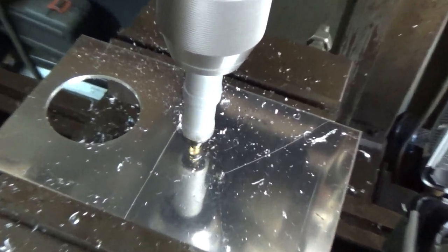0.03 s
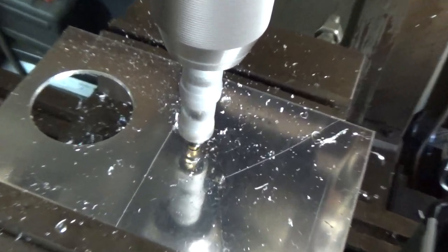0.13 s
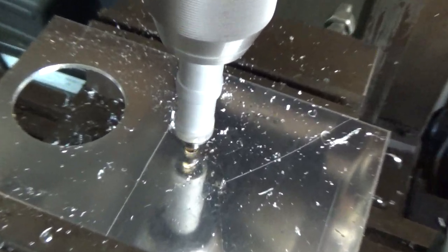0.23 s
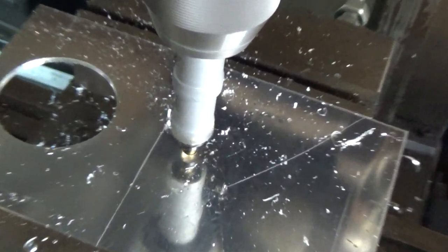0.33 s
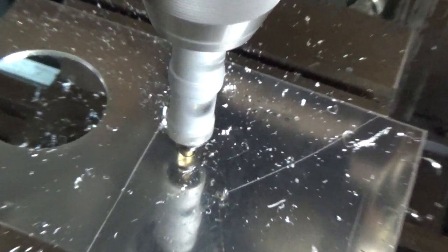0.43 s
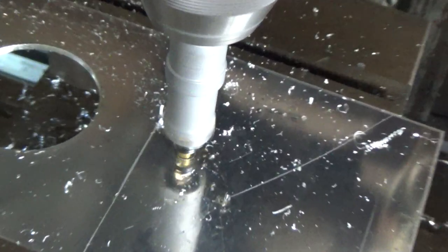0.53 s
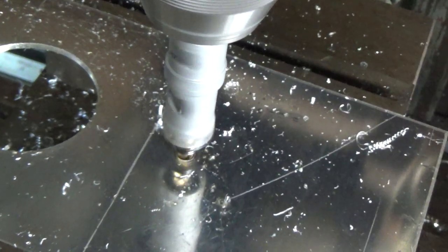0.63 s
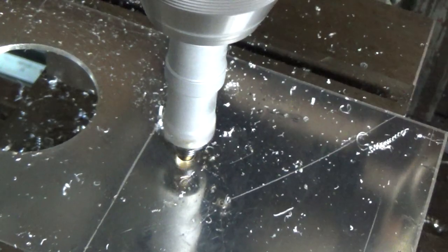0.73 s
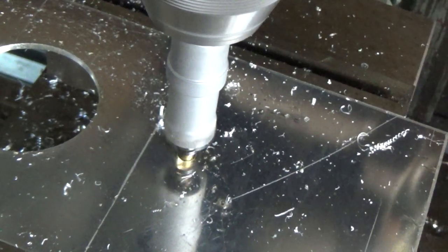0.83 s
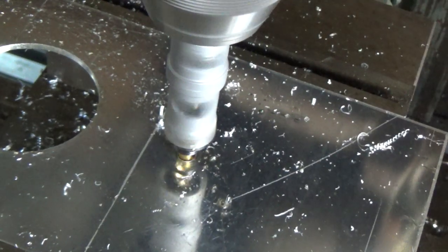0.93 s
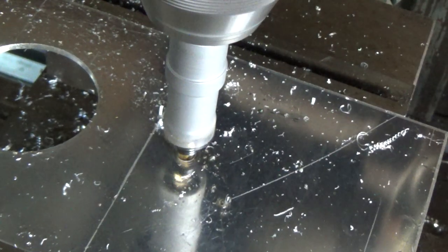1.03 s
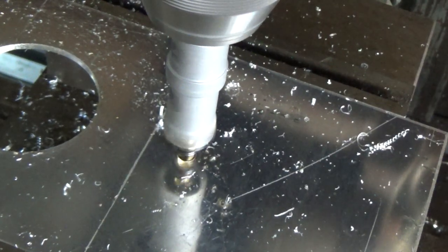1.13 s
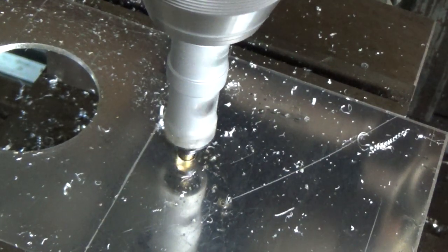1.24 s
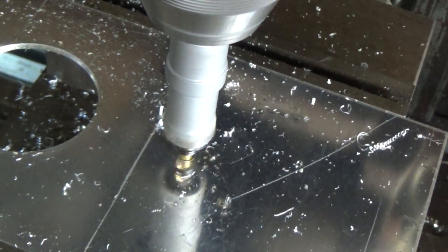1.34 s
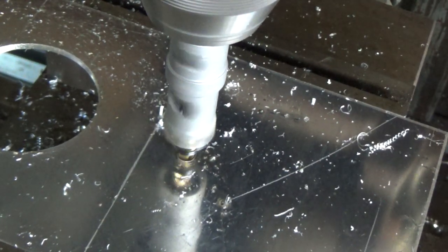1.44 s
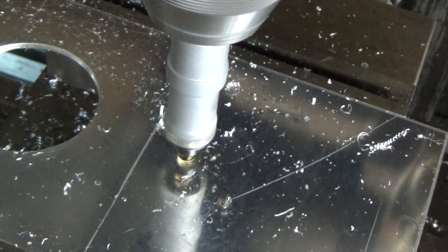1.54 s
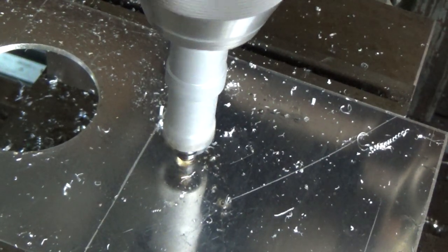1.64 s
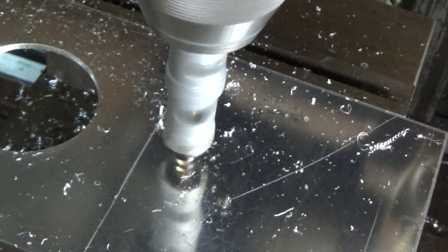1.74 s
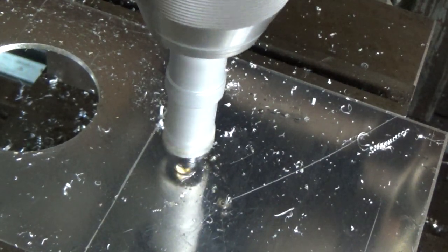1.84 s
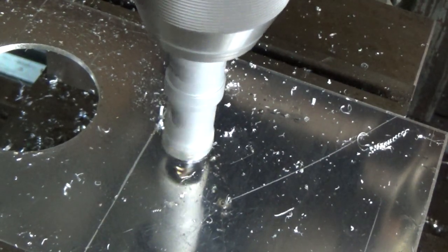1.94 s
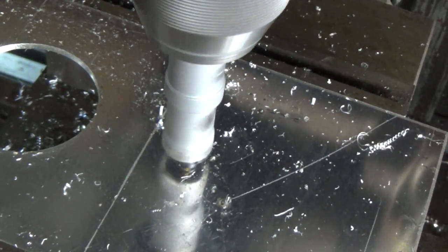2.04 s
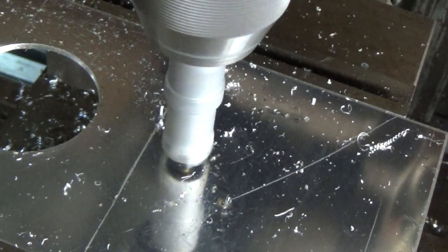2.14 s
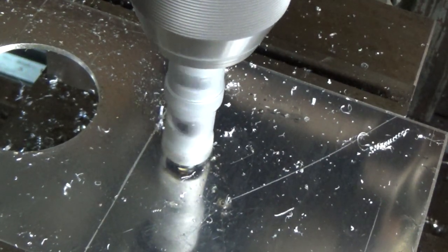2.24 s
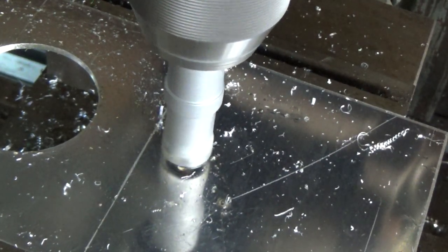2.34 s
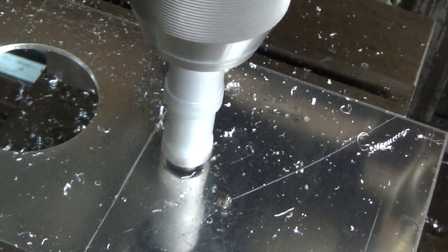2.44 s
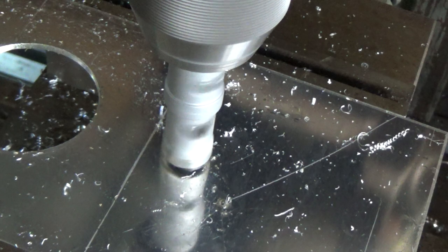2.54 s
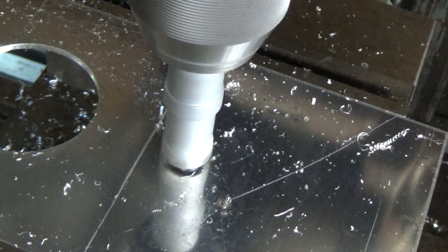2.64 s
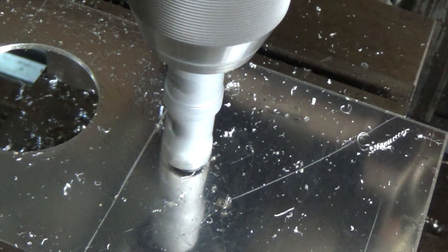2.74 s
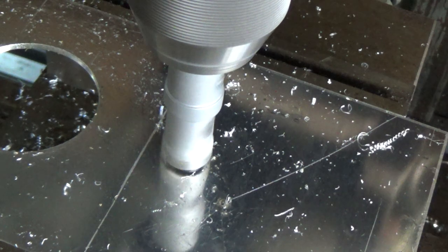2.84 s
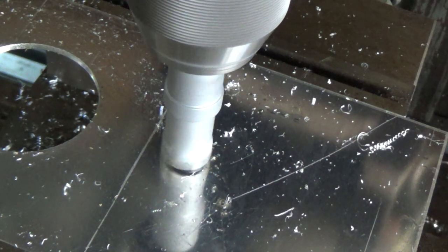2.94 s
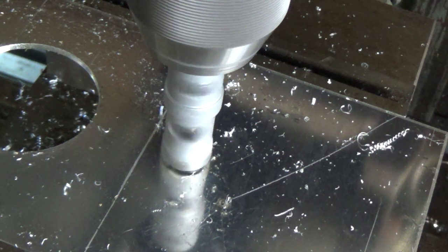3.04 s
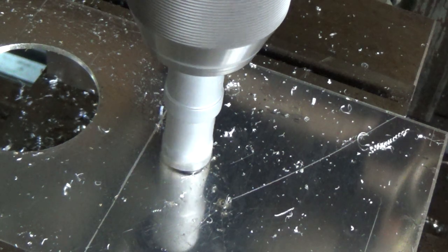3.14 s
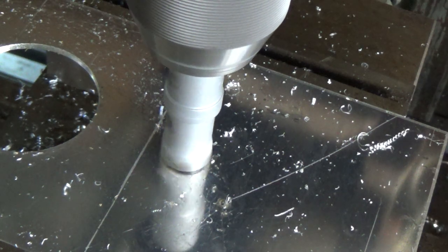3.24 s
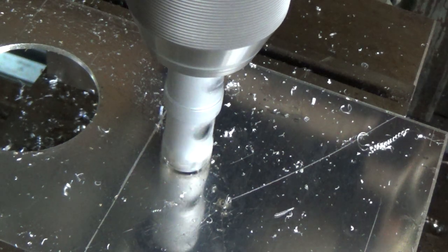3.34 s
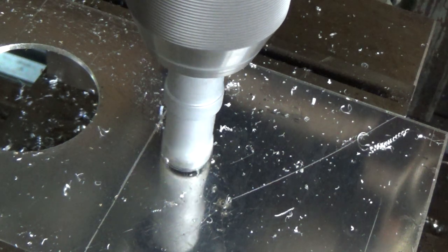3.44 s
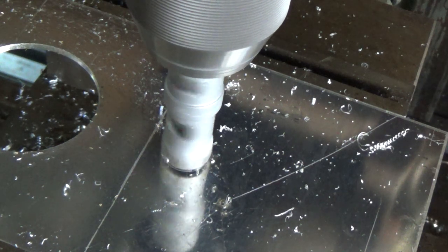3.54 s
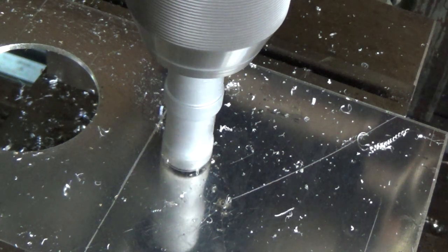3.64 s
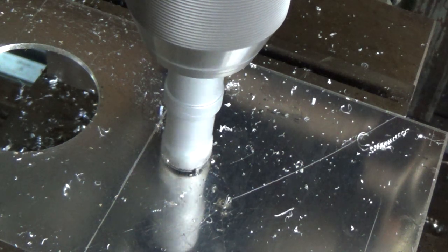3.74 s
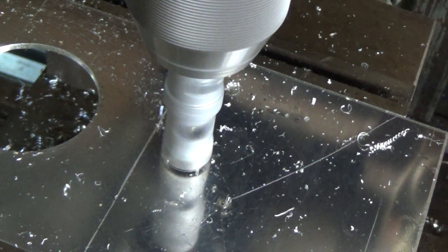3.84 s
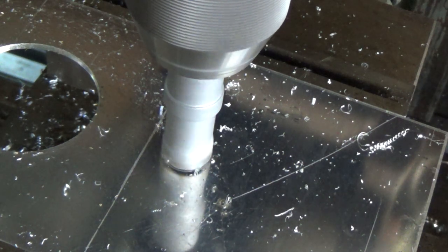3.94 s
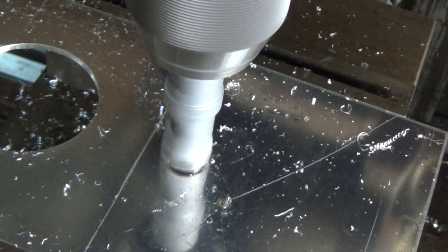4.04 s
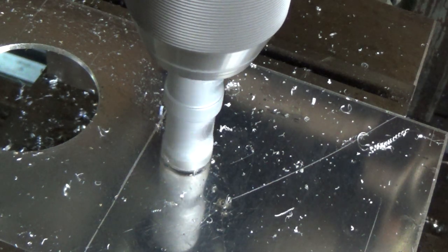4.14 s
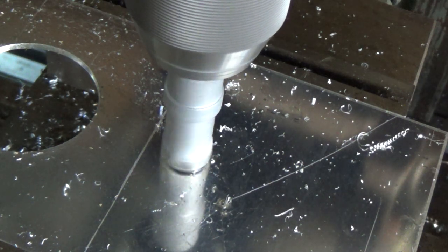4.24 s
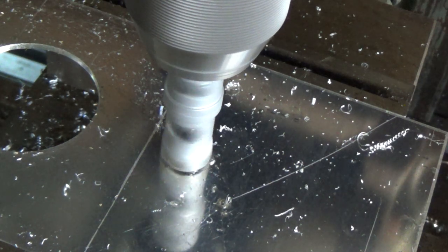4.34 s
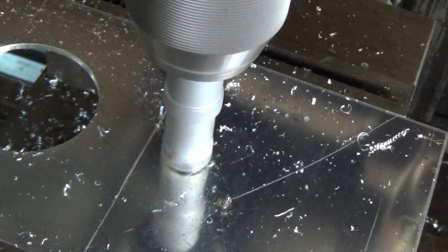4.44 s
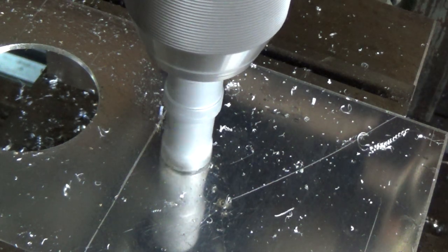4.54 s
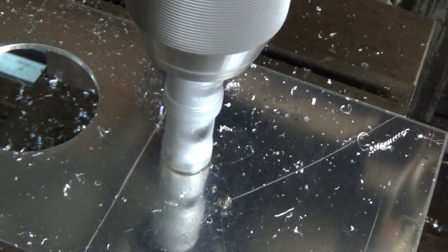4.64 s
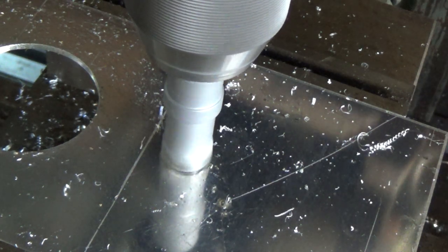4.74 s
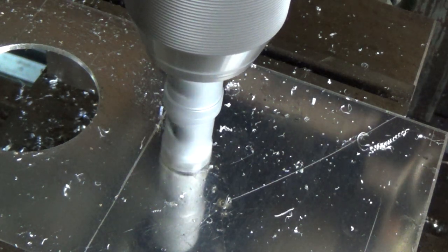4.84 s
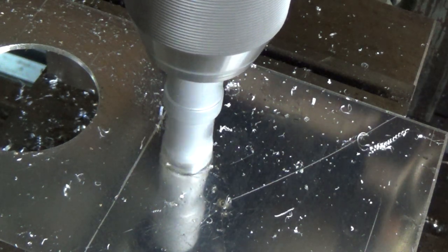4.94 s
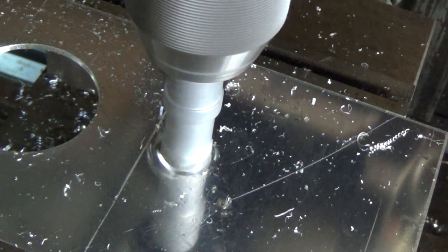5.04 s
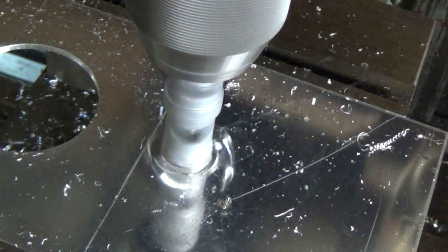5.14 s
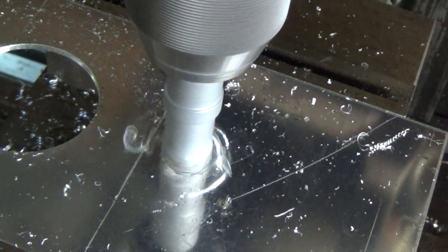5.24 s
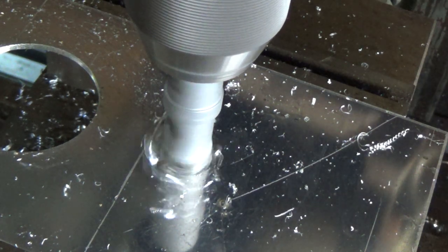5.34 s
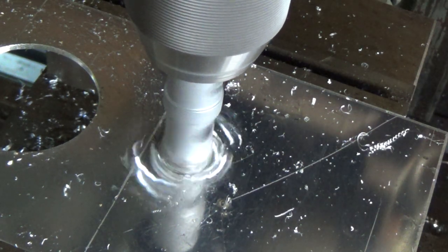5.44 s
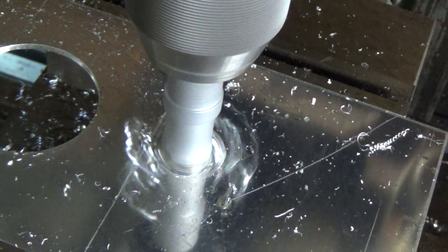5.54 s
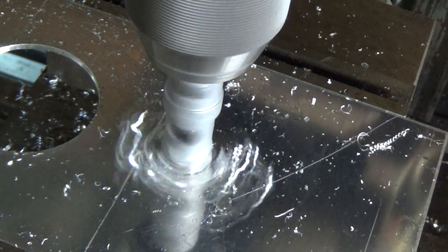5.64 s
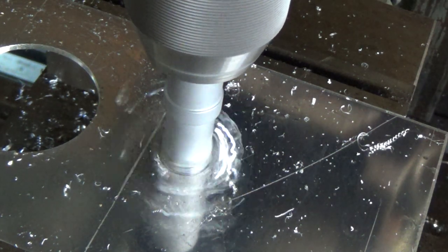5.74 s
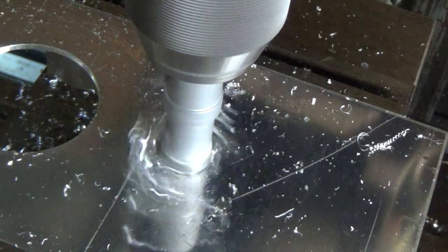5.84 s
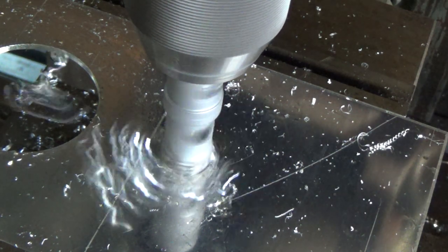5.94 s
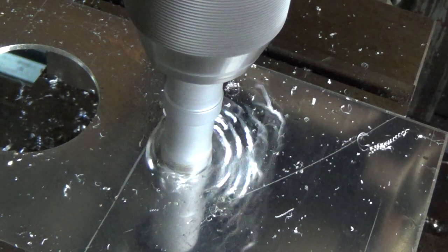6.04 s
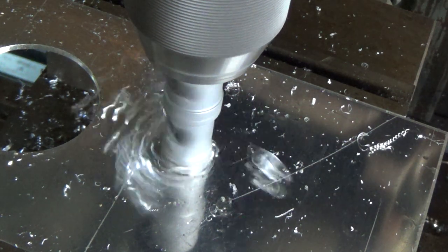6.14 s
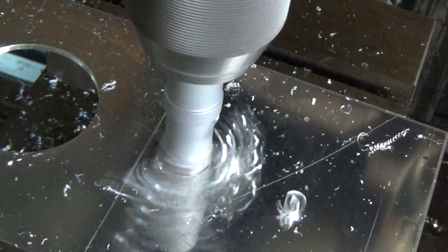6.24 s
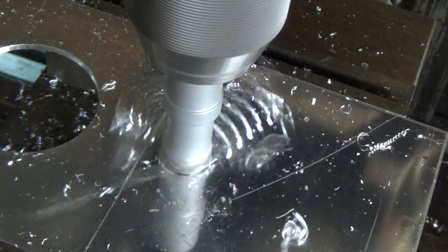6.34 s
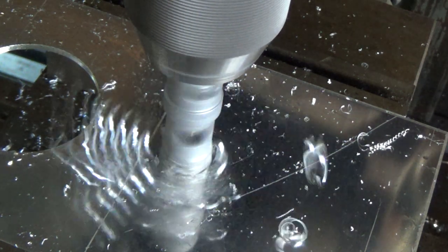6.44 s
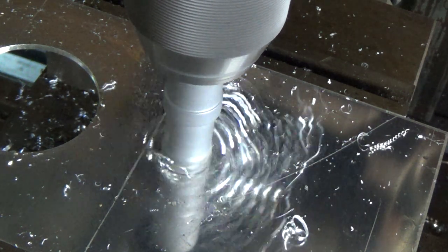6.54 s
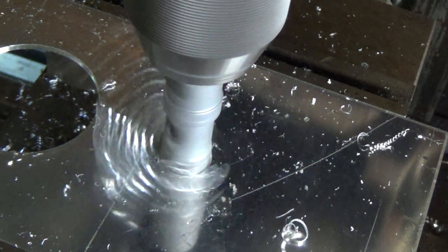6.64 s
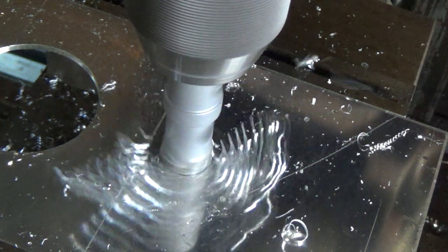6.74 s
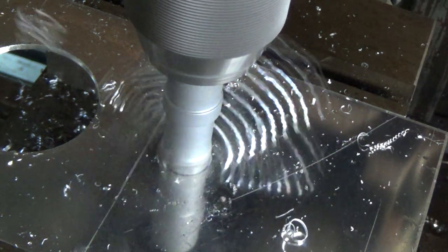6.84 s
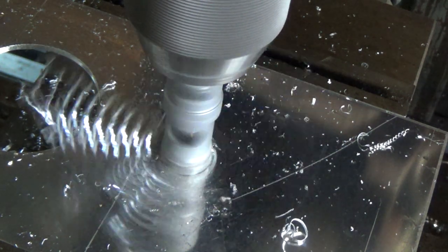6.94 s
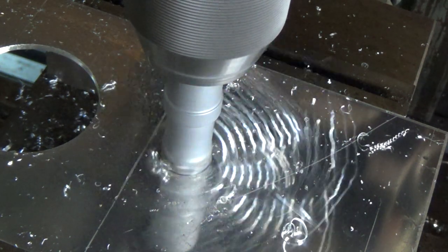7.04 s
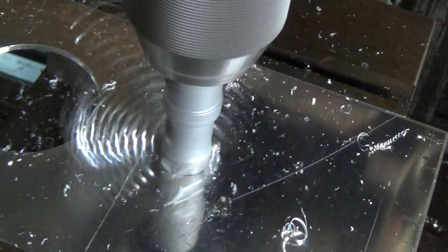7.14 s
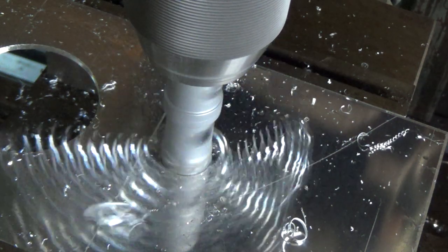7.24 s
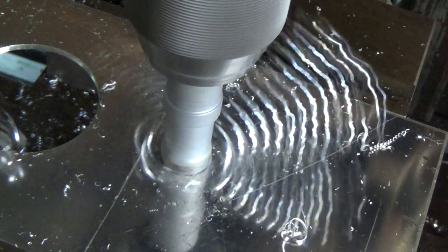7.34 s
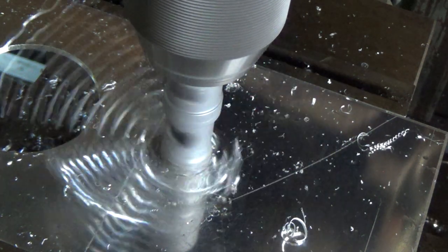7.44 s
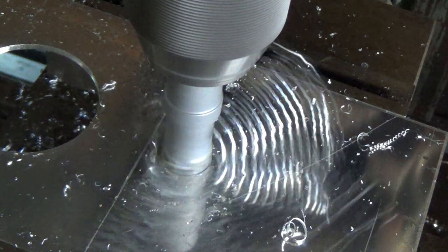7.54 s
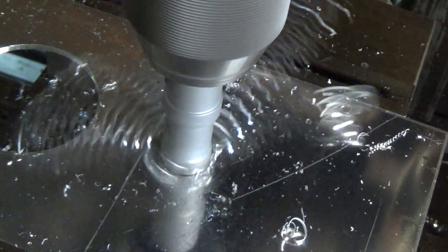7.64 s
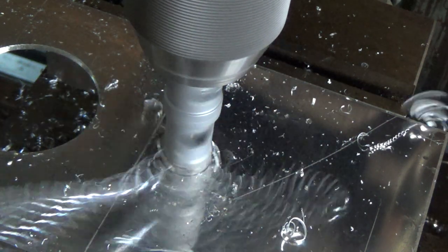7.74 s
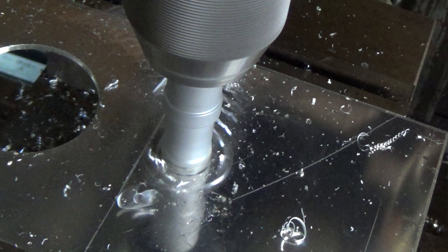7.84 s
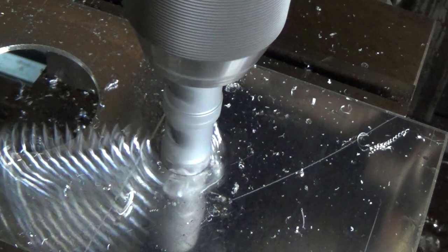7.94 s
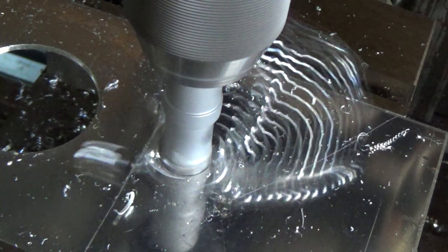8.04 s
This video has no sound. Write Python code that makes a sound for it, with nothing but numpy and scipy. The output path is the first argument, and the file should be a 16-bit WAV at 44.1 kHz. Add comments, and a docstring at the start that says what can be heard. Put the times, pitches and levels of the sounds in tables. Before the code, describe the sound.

A milling machine hums and rattles, a pilot drill ticks and briefly squeals in aluminium sheet, then hole saw teeth tear in with a loud harsh rasp.

```python
"""A belt-driven milling machine runs close to a camera: hum, gear rattle and belt swish, knocking each turn.
The pilot drill of a hole saw begins to rub in the aluminium sheet, its chips ticking as they snap off;
it grabs and slips, and its one long grab squeals. Then the saw teeth land and rasp harshly with every turn.
Noise is shaped by the modes of head, sheet, drill and saw cup; quick reflections and a faint rumble lie around
it, and the camera's gain control pushes hum and rattle down under the loud cutting."""
import sys
import numpy as np
from scipy import signal
from scipy.fft import rfft, irfft
from scipy.io import wavfile
from scipy.ndimage import uniform_filter1d

SR = 44100
rng = np.random.default_rng(int(sys.argv[2]) if len(sys.argv) > 2 else 0)


def put_to_file(sound):
    """Save the sound as 16-bit audio at rate SR, in the file named by the first command-line argument."""
    columns = np.atleast_2d(sound).T  # one column per channel
    safe = np.clip(columns, -1, 1)
    whole_steps = np.round(safe * 32767)
    wavfile.write(sys.argv[1], SR, whole_steps.astype(np.int16))


N = 357210
T = np.arange(N) / SR

SPINDLE_HZ = 6.19  # turns per second before the saw cuts
DRILL_THROUGH_S = 4.92  # the pilot drill breaks through
NO_BASS = signal.butter(3, 280, "high", fs=SR, output="sos")

# Resonances and hollows of the machine head. Each row: centre in Hz, width in Hz, height in dB.
HEAD = [(118, 12, 3), (168, 12, 1.5), (198.2, 13.2, 14.5), (241, 49, -2.5), (294, 22.6, 10.5),
        (376, 13, 6.5), (410, 19.5, 8), (473, 55, -11.5), (630.7, 12.4, 7), (801, 18, 7), (831, 33, -4),
        (1194, 48, 5.5), (1380, 40, -2), (1592, 48, 5.5), (2175, 120, 3)]
# Damped modes of the aluminium sheet. Each row: pitch in Hz, relative level in dB, 60 dB decay in seconds.
SHEET = [(730, -11, 0.0075), (1134, 11, 0.01), (1605, 0.5, 0.075), (2810, -10, 0.027), (4490, -2.5, 0.051),
         (5480, 0, 0.025), (6230, -2.5, 0.019), (6900, -9, 0.049), (7510, 7.5, 0.028), (8100, 8, 0.041),
         (8810, 3.5, 0.034), (9230, 5, 0.013)]
# Modes of the drill and its arbor. Each row: pitch in Hz, relative level in dB, 60 dB decay in seconds.
ARBOR = [(284, -3, 0.17), (1590, -0.5, 0.02), (2140, -7, 0.12), (2536, -1, 0.15), (2690, -1, 0.039),
         (3360, -16, 0.07), (3790, -5, .09), (5030, -15, .04), (4260, 4, 0.054), (5320, -11.5, .06),
         (6200, -4.5, 0.083), (6830, -22, .06), (7600, -3, 0.034), (7900, -5, 0.035), (8030, 11.5, .03),
         (8790, -20, .05), (9800, -3, 0.046), (9400, -31, .06)]


def amp(db):
    """Decibels to gain."""
    return 10 ** (np.asarray(db) / 20)


def unit(x):
    """Scales to rms 1."""
    return x / np.sqrt(np.mean(x ** 2) + 1e-20)


def curve(rows):
    """Each column of a timed table, at every sample."""
    seconds, *columns = np.transpose(rows)
    return [np.interp(T, seconds, column) for column in columns]


def read(points, hz):
    """A spectrum's value, joined on a log-frequency axis."""
    f, value = np.transpose(points)
    return np.interp(np.log(hz + 1), np.log(f + 1), value)


def colour(x, spectrum, peaks=()):
    """Filters by a smooth spectrum with resonances on it; rms 1."""
    hz = np.fft.rfftfreq(len(x), 1 / SR)
    peaks_db = sum(db / (1 + (2 * (hz - f) / width) ** 2) for f, width, db in peaks)
    return unit(irfft(rfft(x) * amp(read(spectrum, hz) + peaks_db), len(x)))


def wander(rate):
    """Smooth chance up to roughly the given rate in Hz; rms 1."""
    hz = np.fft.rfftfreq(N, 1 / SR)
    return unit(irfft(rfft(rng.standard_normal(N)) / (1 + (hz / rate) ** 4), N))


def grit(clump_db, rate):
    """Noise of countless tiny impacts that come in clumps; rms 1."""
    return unit(rng.standard_normal(N) * amp(clump_db * wander(rate)))


def patchy(x, depth_db, size):
    """Brief random swells, each a few hundred hertz wide."""
    z = signal.stft(x, SR, nperseg=512)[2]
    patches = uniform_filter1d(rng.standard_normal(z.shape), size=size, axis=0)
    patches = unit(uniform_filter1d(patches, size=size, axis=1))
    return signal.istft(z * amp(depth_db * patches), SR, nperseg=512)[1][:N]


def ring(modes, spread_db=0., detune=0.):
    """One blow on a body with these modes; where it lands shifts their balance and pitch."""
    t = np.arange(SR // 5) / SR
    chance = rng.standard_normal((len(modes), 2))
    out = np.zeros(len(t))
    for (hz, db, t60), (balance, pitch) in zip(modes, chance):
        fading = amp(db + spread_db * balance - 60 * t / t60)
        out += fading * np.cos(2 * np.pi * hz * (1 + detune * pitch) * t)
    return out


def burst(x):
    """Small parts radiate no bass; the loudest 4 ms get rms 1."""
    x = signal.sosfilt(NO_BASS, x)
    return x / np.sqrt(uniform_filter1d(x ** 2, size=176).max())


def add(mix, s, sound):
    """Mixes a sound in at time s."""
    part = mix[round(s * SR):][:len(sound)]
    part += sound[:len(part)]


def spots(rows, belt_hz=3.612):
    """Summed dB swells of spots that come round with every lap of the belt, one curve per level column."""
    total = 0
    for at, width, *dbs in rows:
        away = (T * belt_hz - at + .5) % 1 - .5  # share of a lap from the spot
        total = total + np.outer(dbs, np.exp(-(away / width) ** 2))
    return total


def drive(hum_hz=361.8):
    """Hum, gear rattle and belt swish swell and sag with every lap of the belt."""
    # Slack spots, where the hum drops. Each row: share of the lap, width as share of the lap, hum in dB.
    slack_spots = [(.04, 0.049, -29.5), (.23, 0.065, -3), (.52, 0.063, -4.5)]
    # Tight spots. Each row: share of the lap, width as share of the lap, rattle in dB, swish in dB.
    tight_spots = [(.22, 0.11, 3, 6.5), (.69, 0.19, 6, 11.5)]
    # Colour of the gear rattle. Each row: frequency in Hz, relative dB per Hz.
    rattle_colour = [(30, -42), (70, -37), (120, -24), (180, -16.5), (270, -8), (450, -1), (620, 0.5),
                     (1250, -0.5), (1450, -4), (2000, -6.5), (2400, -12), (3000, -13), (3700, -20),
                     (10000, -47.5)]
    # Colour of the belt swish. Each row: frequency in Hz, relative dB per Hz.
    swish_colour = [(1500, -31), (3000, -22.5), (4200, -0.5), (6000, -2), (7000, 1), (8100, 2.5),
                    (8800, -0.5), (10300, -10.5)]
    (hum_db,) = spots(slack_spots)
    rattle_db, swish_db = spots(tight_spots)
    turn_db = 1.0 * np.cos(2 * np.pi * (SPINDLE_HZ * T - 0.18))  # swells 1 dB, peaking at 0.18 turn
    hum = np.sin(2 * np.pi * hum_hz * T + 0.13 * wander(11))
    hum = hum * amp(-30.5 + hum_db + 1.6 * wander(9.1))
    rattle = colour(grit(clump_db=1.0, rate=270), rattle_colour, HEAD)
    rattle = rattle * amp(-31.0 + rattle_db + turn_db + 0.41 * wander(25))
    swish = colour(grit(clump_db=1.0, rate=240), swish_colour) * amp(-44.5 + swish_db)
    return hum + patchy(rattle, depth_db=1.45, size=6) + swish


def rumble():
    """A faint low rumble, separate noise in each channel; rms 1."""
    spectrum = [(20, -12), (90, 1), (300, -29.5), (2000, -64)]  # Hz, relative dB per Hz
    return np.array([colour(rng.standard_normal(N), spectrum) for _ in range(2)])


def workshop(x, t60=0.085):
    """Quick reflections from the table and column, different at each microphone."""
    # Colour of the reflections. Each row: frequency in Hz, relative level in dB.
    room_colour = [(100, -1.5), (300, -1.5), (650, 2), (1300, -1), (4500, 2), (7500, -1), (10000, -10)]
    t = np.arange(SR // 3) / SR
    tail = np.array([colour(rng.standard_normal(len(t)), room_colour) for _ in range(2)])
    tail = tail * amp(-60 * t / t60) * (t > .001)  # nothing returns in the first millisecond
    return signal.fftconvolve(x[None], tail / np.linalg.norm(tail[0]), axes=1)[:, :N]


def knocks(first_s=0.0401, t60=0.089, knock_db=3.5):
    """Loose gear teeth clack once a turn and shake the head; the strength rises and falls over time."""
    # Strength of the knocks. Each row: time in seconds, level in dB to which knock_db is added.
    play_levels = [(0, -28.5), (.68, -20.5), (1.0, -27.5), (1.7, -23.5), (2.15, -32.5), (4.6, -26)]
    # Colour of the clack. Each row: frequency in Hz, relative dB per Hz.
    knock_colour = [(300, -30.5), (700, 4.5), (1300, 1), (2200, -9.5), (2900, -1), (3500, -22),
                    (10000, -24)]
    play_db, = curve(play_levels)
    since = (T - first_s) % (1 / SPINDLE_HZ)  # seconds since the last knock
    force = amp(play_db + knock_db - 60 * since / t60)
    clack = uniform_filter1d(force, size=220) * colour(rng.standard_normal(N), knock_colour, HEAD)
    return signal.sosfilt(NO_BASS, clack)


def rubbing(rub_start_s=1.62, fade_db_per_s=318):
    """Level of the pilot drill's rubbing in dB, from when it begins to rub to breaking through."""
    # Rubbing of the drill as it is pressed down. Each row: time in seconds, level in dB.
    rub_levels = [(1.62, -48), (1.8, -36), (2.25, -35), (2.55, -33.5), (2.7, -41.5), (3.12, -47),
                  (3.26, -29), (3.65, -44.5), (4.4, -35), (4.92, -35.5)]
    outside_s = np.maximum(rub_start_s - T, 0) + np.maximum(T - DRILL_THROUGH_S, 0)
    return curve(rub_levels)[0] - fade_db_per_s * outside_s


def rub(arbor_share=0.43):
    """The pilot drill scrapes crumbs off the sheet; sheet and arbor both ring faintly."""
    body = ring(SHEET) + arbor_share * ring(ARBOR)
    scrape = signal.oaconvolve(grit(clump_db=6.0, rate=210), body)[:N]
    spectrum = [(100, -35), (1000, 0.5), (2500, -1.5), (4300, -4.5), (8000, -6.0)]  # Hz, relative dB
    return amp(rubbing()) * colour(scrape, spectrum)


def crumbs(first_s=1.746, catches_per_turn=4, spread_db=1):
    """Small chips break as the edges catch each quarter turn, following the rubbing; rows as in snaps()."""
    times = np.arange(first_s, DRILL_THROUGH_S, 1 / (catches_per_turn * SPINDLE_HZ))
    levels = np.interp(times, T, rubbing()) + spread_db * rng.standard_normal(len(times))
    return [(s, db + 5.5, db + 3, db - 11) for s, db in zip(times, levels)]


def snaps(snap_db=-3.0, thud_db=0.5, slip_s=0.0028, ping_hz=2093, ping_t60=0.22):
    """Each breaking chip, and the first saw tooth, cracks with a quick run of slips that rings the sheet."""
    # Large chips snapping off; the last row is the first saw tooth striking the sheet. Each row: start in
    # seconds, crack in dB to which snap_db is added, thud in dB to which thud_db is added, lingering ping in dB.
    large_cracks = [(1.786, -21, -41, -45), (2.071, -17, -37, -43), (2.209, -15, -21.5, -25.5),
                    (2.288, -20.5, -34, -48), (2.485, -16, -21, -34), (2.555, -14, -37, -36),
                    (2.871, -20, -27, -24), (3.019, -22.5, -41, -40), (3.246, -26, -20.5, -42),
                    (3.280, -35, -16, -25), (3.353, -21, -17, -45), (3.51, -21.5, -29, -38),
                    (3.567, -20, -33, -50), (3.727, -24, -37, -50), (3.889, -14.5, -31, -52),
                    (4.052, -14.5, -34, -45), (4.168, -26, -22, -42), (4.213, -22, -30, -47),
                    (4.25, -24, -14, -45), (4.329, -21.5, -16.5, -50), (4.375, -17, -21, -46),
                    (4.773, -26.5, -20, -48), (4.813, -17, -17.5, -39), (4.937, -30, -13.5, -35)]
    out, t = np.zeros(N), np.arange(SR // 5) / SR
    ping = np.sqrt(2) * np.sin(2 * np.pi * ping_hz * t) * amp(-60 * t / ping_t60)  # the sheet's longest mode
    for s, crack_db, low_db, ping_db in [*large_cracks, *crumbs()]:
        slips = rng.standard_normal(len(t)) * np.exp(-t / slip_s)
        blows = []
        for modes in (SHEET[:3], SHEET[3:]):  # low modes thud, high modes tick
            body = ring(modes, spread_db=3.5, detune=0.015)
            blows.append(burst(signal.fftconvolve(slips, body)[:len(t)]))
        thud, tick = blows
        crack = tick + .5 * burst(slips)
        add(out, s, amp(crack_db + snap_db) * crack + amp(low_db + thud_db) * thud + amp(ping_db) * ping)
    return out


def singing(grip, t):
    """Steady friction keeps each arbor mode sounding; let go, it dies at its own speed."""
    out, starts = 0, rng.random(len(ARBOR))
    for (hz, db, t60), start in zip(ARBOR, starts):
        fall = amp(-60 * t / t60)
        held = fall * np.maximum.accumulate(grip / fall)
        out = out + amp(db) * held * np.sin(2 * np.pi * (hz * t + start))
    return out


def grabs(rise=0.0024, fall=0.002, third_db=-13, fifth_db=-19, jitter=0.016, raw=0.31, rung=0.85, sung=0.48):
    """Stick and slip: the drill swings in a squarish wave while its scraping rings the arbor."""
    # The drill grabs and slips; a long grab squeals. Each row: start in seconds, length in seconds,
    # tone in dB, mean pitch in Hz, scrape in dB.
    grab_rows = [(3.358, 0.049, -12, 844, -13.5), (3.42, 0.027, -27, 850, -27),
                 (3.883, .007, -19.5, 890, -25), (4.248, 0.0066, -15.5, 887, -25),
                 (4.391, 0.0048, -11.5, 951, -29), (4.410, 0.0051, -15, 1084, -38)]
    build_share, linger_share = 0.13, 0.19  # the tone builds, the grab lingers: shares of its length
    bite, bite_s = 0.93, 0.011  # a grab scrapes harder at first, by this share and for this long
    scrape_colour = [(400, -7), (1200, 3), (3000, -4), (10000, -18)]  # Hz, relative dB
    out, t = np.zeros(N), np.arange(SR // 5) / SR
    waver = wander(120)
    for s, length, tone_db, hz, scrape_db in grab_rows:
        release = np.exp(-np.maximum(t - length, 0) / (fall + linger_share * length))
        held = (1 - np.exp(-t / rise)) * release
        swing = held * (1 - np.exp(-t / (build_share * length)))
        grip = held * (1 + bite * np.exp(-t / bite_s))
        pitch = hz * (1 + jitter * waver[round(s * SR):][:len(t)])
        phase = 2 * np.pi * np.cumsum(pitch) / SR
        tone = np.sin(phase) + amp(third_db) * np.sin(3 * phase) + amp(fifth_db) * np.sin(5 * phase)
        slips = grip * (1 + np.cos(phase)) * rng.standard_normal(len(t))  # one slip in every swing
        struck = burst(signal.fftconvolve(slips, ring(ARBOR))[:len(t)])
        arbor = rung * struck + sung * burst(singing(grip, t))
        scrape = raw * burst(colour(slips, scrape_colour))
        add(out, s, amp(tone_db) * np.sqrt(2) * swing * tone + amp(scrape_db) * (arbor + scrape))
    return out


def turning(x, loaded_hz=6.1):
    """The uneven cup favours one register after another as it goes round, slower under load."""
    # How strongly each register radiates. Each row: frequency in Hz, once-a-turn swing in dB, its peak as
    # share of the turn, twice-a-turn swing in dB, its peak as share of the turn.
    lobes = [(1210, 3, 0.58, 0.5, 0.46), (1580, 1, 0.49, 2, 0.48), (2100, 0, .7, 0.9, 0.67),
             (3180, 1.14, 0.34, 2.5, 0.36), (5280, 0.4, 0.69, -1, 0.36), (7540, -0.06, .1, 1.5, 0.24),
             (9250, .9, 0.025, 0.9, 0.12)]
    hz, t, z = signal.stft(x, SR, nperseg=512)
    angle = 2 * np.pi * loaded_hz * t
    swing_db = []
    for _, once_db, once_at, twice_db, twice_at in lobes:
        once = once_db * np.cos(angle - 2 * np.pi * once_at)
        twice = twice_db * np.cos(2 * (angle - 2 * np.pi * twice_at))
        swing_db.append(once + twice)
    centres = np.transpose(lobes)[0]
    weights = np.array([np.interp(hz, centres, row) for row in np.eye(len(lobes))])
    return signal.istft(z * amp(weights.T @ np.array(swing_db)), SR, nperseg=512)[1][:N]


def saw(growl_db=-12, free_ring=1.5, damped_ring=0.8):
    """The teeth tear at the sheet; as the kerf deepens it damps the cup and the rasp fills out."""
    # The saw under the hand feed. Each row: time in seconds, rasp of the teeth in dB, hiss of the chips in dB.
    feed = [(4.98, -15, -14), (5.05, -7, -10.5), (5.27, -8.5, -4.5), (5.5, -7.5, -7.5), (5.8, -4, -6),
            (6.8, -3.5, -4.5), (7.25, -7, -6), (7.5, -7.5, -7.5), (7.8, -1.5, -4), (8.1, 1.5, -4)]
    # Colour of the rasp in a shallow kerf. Each row: frequency in Hz, relative dB per Hz.
    shallow_colour = [(40, -41), (110, -43), (400, -24.5), (560, -7), (740, -16), (1050, 0), (1350, -2),
                      (1700, 2), (2300, -3), (3500, -7.5), (4700, -3.5), (5500, -8.5), (6500, -27.5),
                      (9000, -11.5)]
    # Colour of the rasp in a deep kerf. Each row: frequency in Hz, relative dB per Hz.
    deep_colour = [(40, -39), (110, -42.5), (400, -25), (720, -17), (900, -8), (1100, -2.5), (1700, 1),
                   (2400, -2.5), (3500, -4.5), (4700, -9), (5500, -13.5), (6500, -22), (9000, -47)]
    # Low growl of the deep kerf. Each row: frequency in Hz, relative dB per Hz.
    growl_colour = [(300, -41), (600, -12.5), (720, 1), (830, -7), (1300, -24)]
    # Colour of the chips. Each row: frequency in Hz, relative dB per Hz.
    chip_colour = [(500, -58), (3000, -38), (6000, -10), (6900, -4.5), (7500, 2.5), (8200, 0.5),
                   (8600, 3.5), (9700, 1.5), (10300, -8)]
    # Resonances and hollows of the saw cup bearing on the sheet. Each row: centre in Hz, width in Hz,
    # height in dB, to be scaled by free_ring or damped_ring.
    cup_modes = [(1483, 56, -7.5), (1570, 55, 6), (1718, 74, 5), (1940, 180, -4.5), (2072, 25, 8.5),
                 (2780, 160, 1.5), (3073, 83, -7), (3310, 140, 3.5), (3850, 85, 1.5), (4430, 110, -7),
                 (4550, 96, 5.5), (5806, 125, 9.5), (7930, 130, 1.5), (7320, 44, 2.5), (7950, 70, 6),
                 (8190, 105, 12), (8600, 78, -5)]
    touch_s, touch_db, land_s, rise_s = 4.85, -20.5, 4.933, 0.036  # the teeth brush the sheet, then land
    kerf_start_s, kerf_deepen_s = 5.18, 0.83  # the kerf forms, and deepens ever more slowly
    teeth_db, chips_db = curve(feed)
    touch, landed = (np.clip((T - s) / rise_s, 0, 1) for s in (touch_s, land_s))
    contact = np.maximum(amp(touch_db) * touch, landed)
    depth = 1 - np.exp(-np.maximum(T - kerf_start_s, 0) / kerf_deepen_s)
    free = [(hz, width, db * free_ring) for hz, width, db in cup_modes]
    damped = [(hz, width, db * damped_ring) for hz, width, db in cup_modes]
    tearing = grit(clump_db=1.0, rate=410)
    rasp = (1 - depth) * colour(tearing, shallow_colour, free) + depth * colour(tearing, deep_colour, damped)
    growl = depth ** 6 * colour(rng.standard_normal(N), growl_colour)
    rasp = rasp + amp(growl_db) * growl
    hiss = colour(grit(clump_db=1.04, rate=770), chip_colour, damped)
    cutting = amp(teeth_db) * rasp + amp(chips_db) * hiss
    return contact * turning(patchy(cutting, depth_db=1.62, size=5))


def scene():
    """Machine, drill and saw nearly central, the grabs left of centre, with reflections and a faint rumble."""
    near = drive() + knocks() + rub() + snaps() + saw() * amp([[.15], [-.15]])
    grab = grabs()
    reflections = workshop(near.mean(0) + grab)
    return near + grab * amp([[1.9], [-2.6]]) + amp(-14.5) * reflections + amp(-74) * rumble()


def record(dry, limit_db=-15, recovery_db=28, sense=0.0075, slope=0.99, ceiling=1.1, edge_hz=10350):
    """The camera's gain falls within milliseconds on loud sound and recovers slowly; then the band limit."""
    keep = np.exp(-1 / (sense * SR))
    power = signal.lfilter([1 - keep], [1, -keep], (dry ** 2).mean(0))
    power_db = 10 * np.log10(power + 1e-12)
    fall = T * recovery_db  # the sensed peak sinks by recovery_db each second
    over_db = np.maximum(np.maximum.accumulate(power_db + fall) - fall - limit_db, 0)
    held = dry * amp(-slope * uniform_filter1d(over_db, size=128))
    held = ceiling * np.tanh(held / ceiling)  # the highest peaks are gently rounded
    lowpass = signal.firwin(601, edge_hz, window=("kaiser", 8), fs=SR)
    return signal.oaconvolve(held, lowpass[None], "same")


dry = scene()
out = record(dry)
put_to_file(out)
```